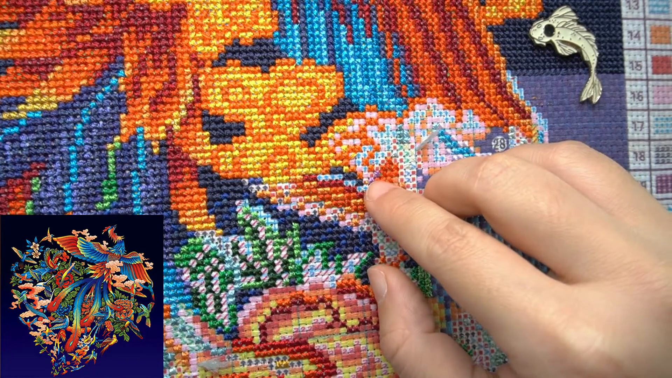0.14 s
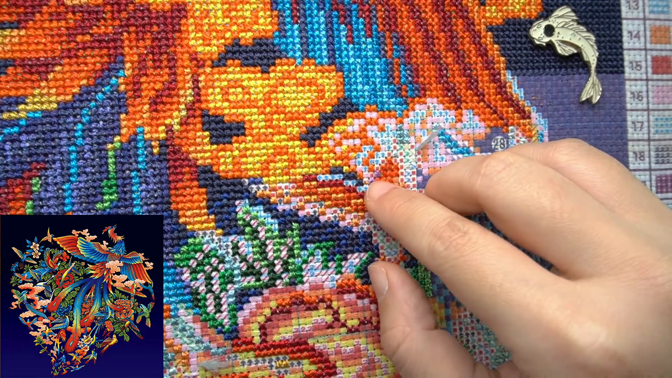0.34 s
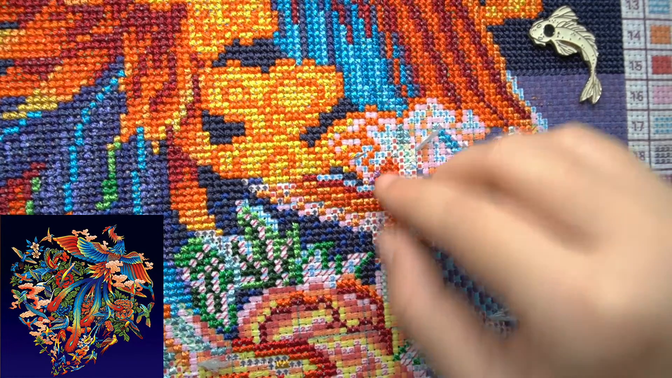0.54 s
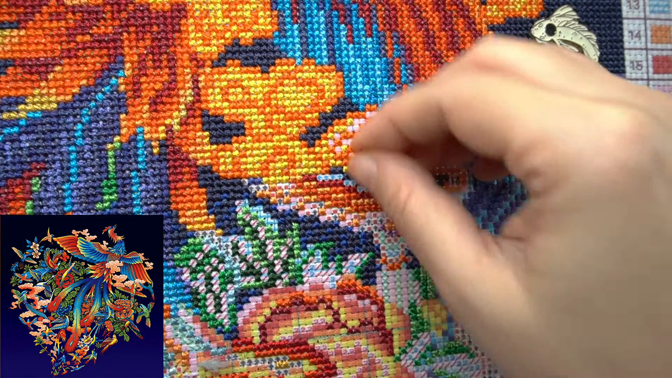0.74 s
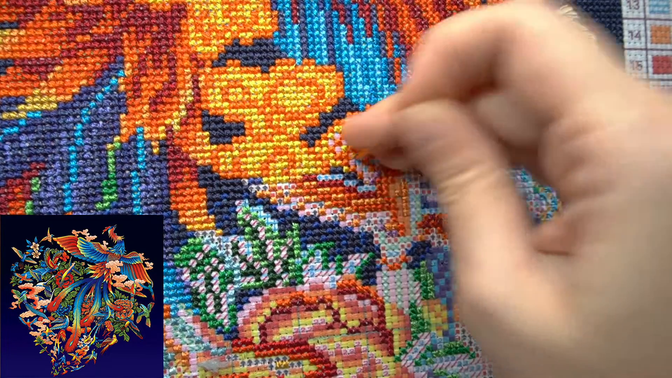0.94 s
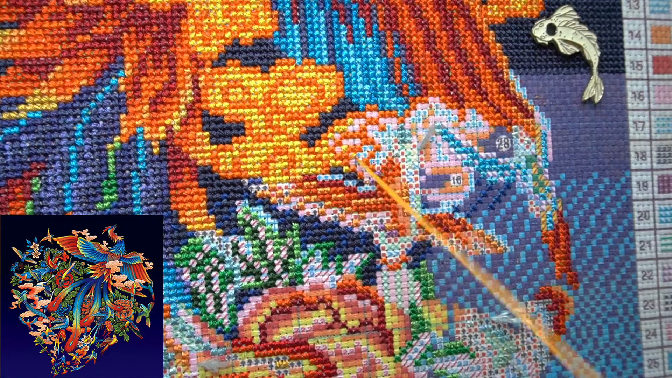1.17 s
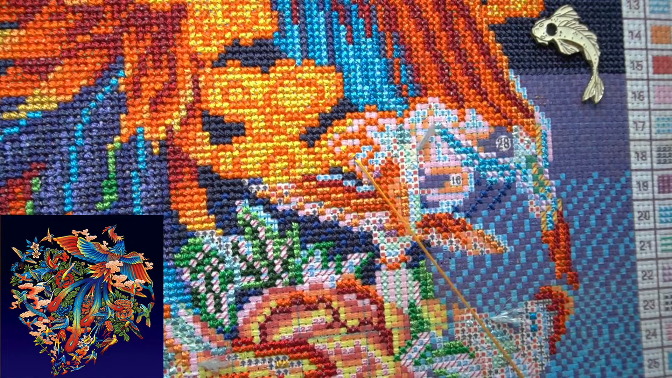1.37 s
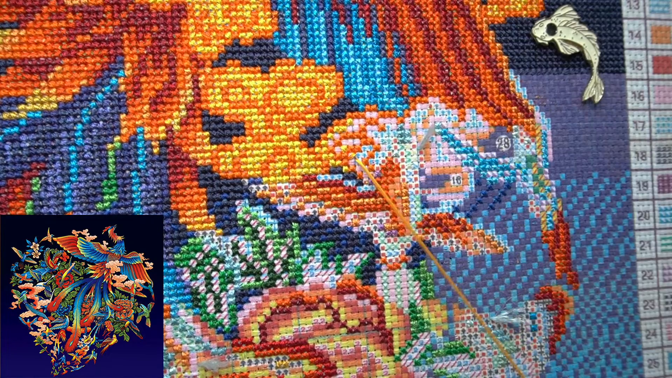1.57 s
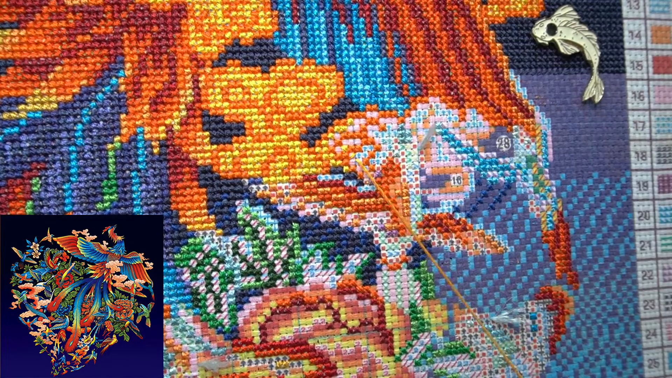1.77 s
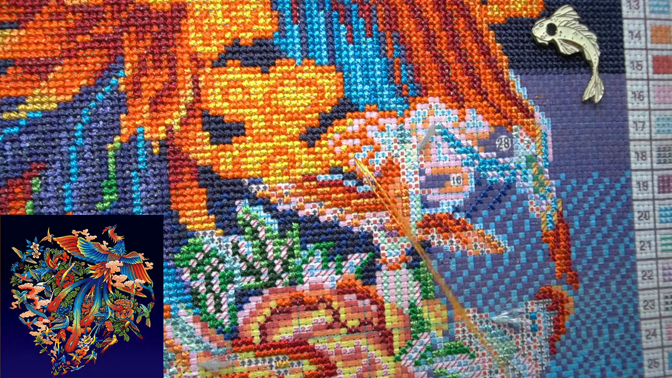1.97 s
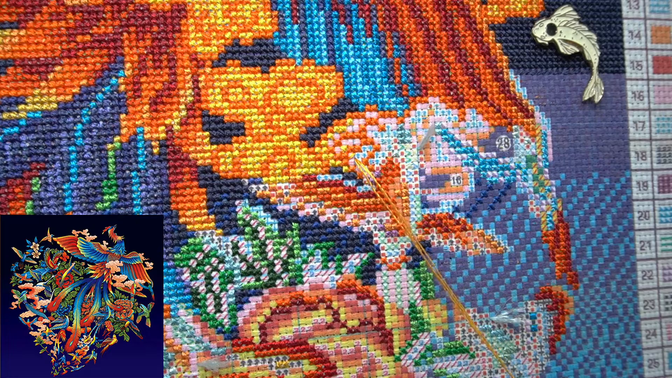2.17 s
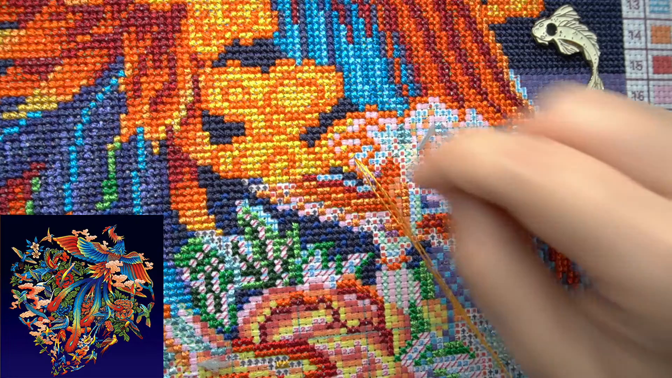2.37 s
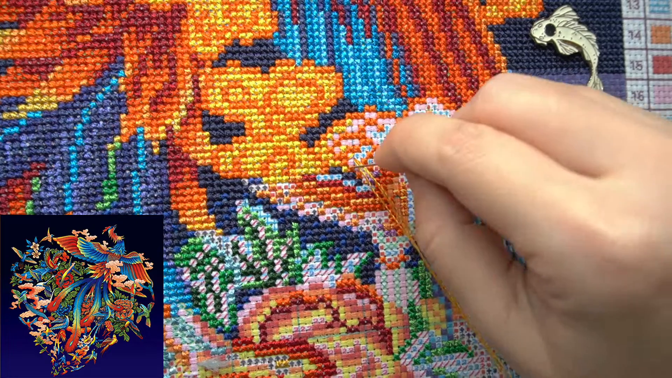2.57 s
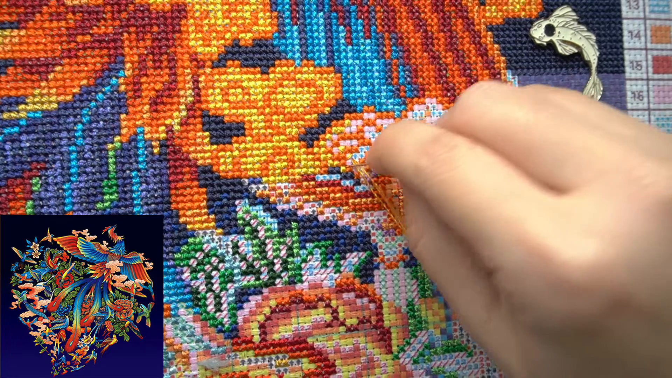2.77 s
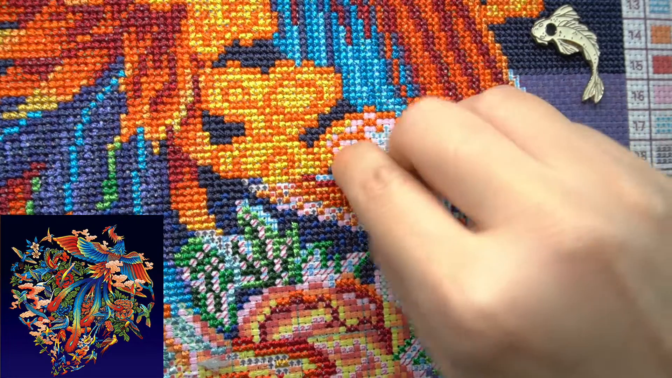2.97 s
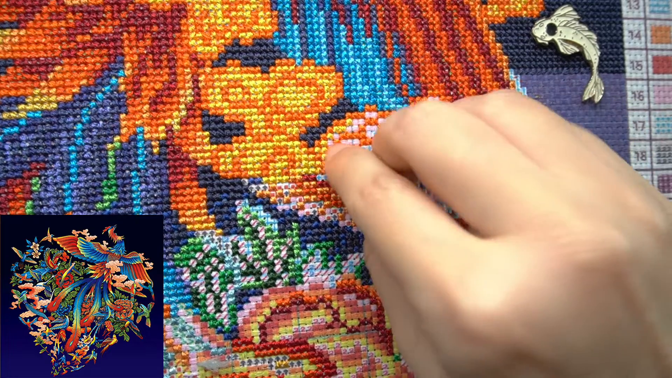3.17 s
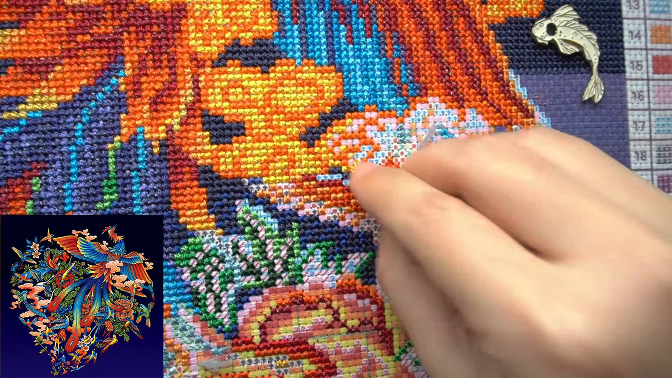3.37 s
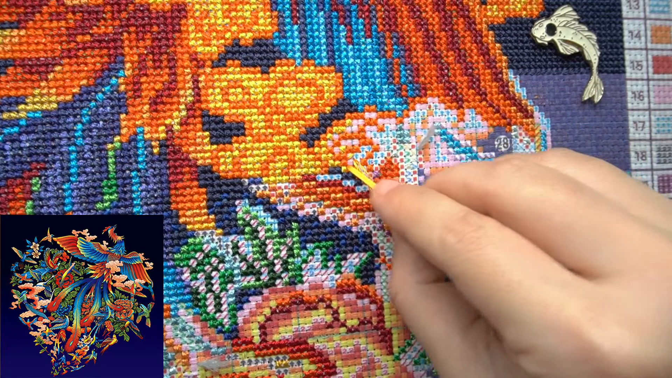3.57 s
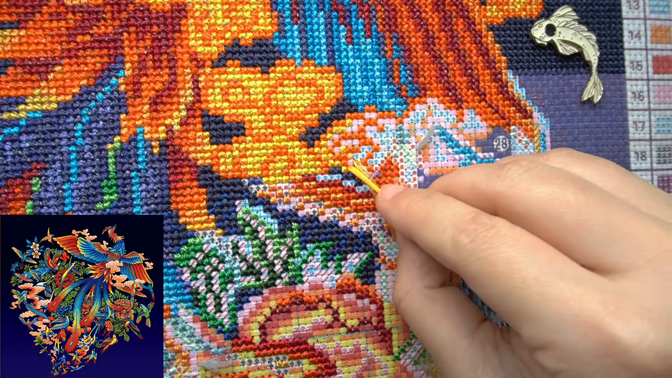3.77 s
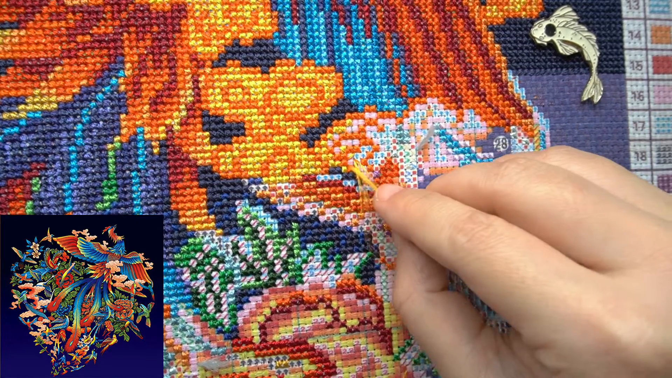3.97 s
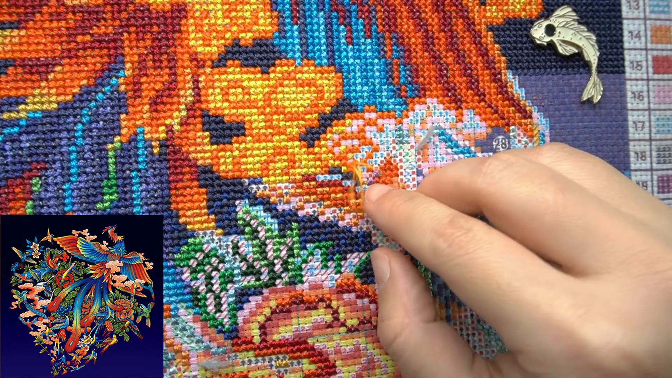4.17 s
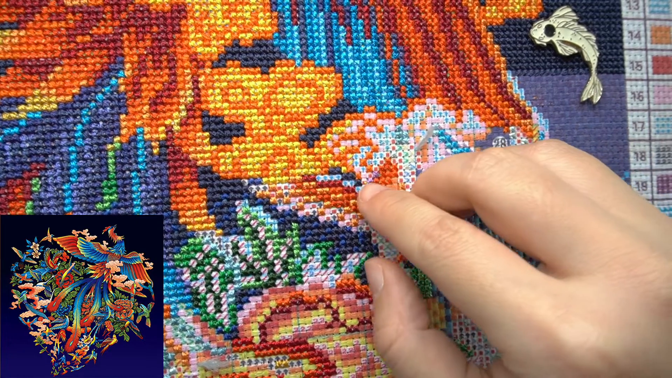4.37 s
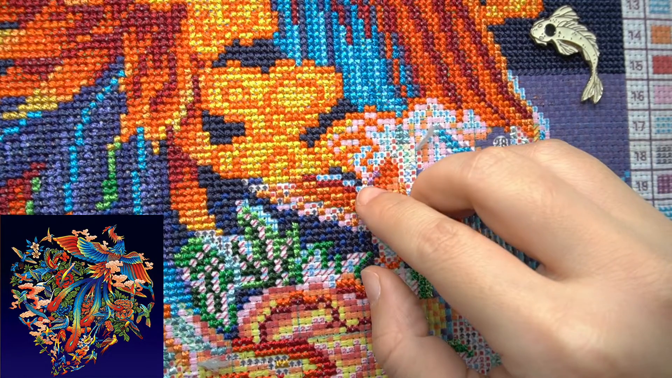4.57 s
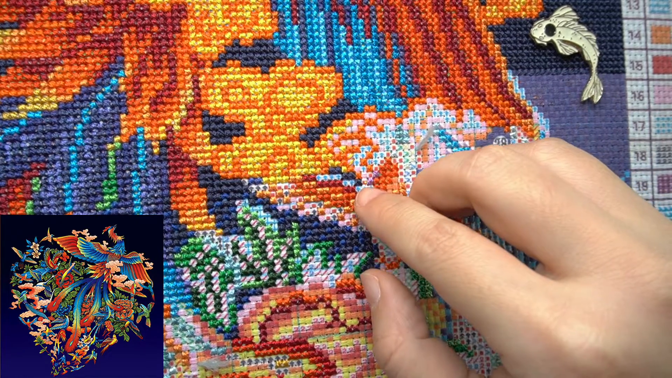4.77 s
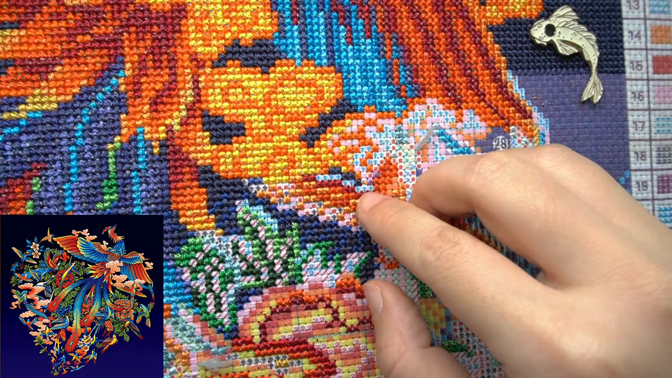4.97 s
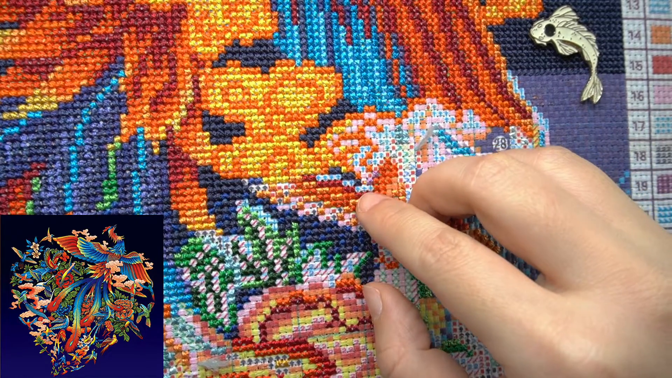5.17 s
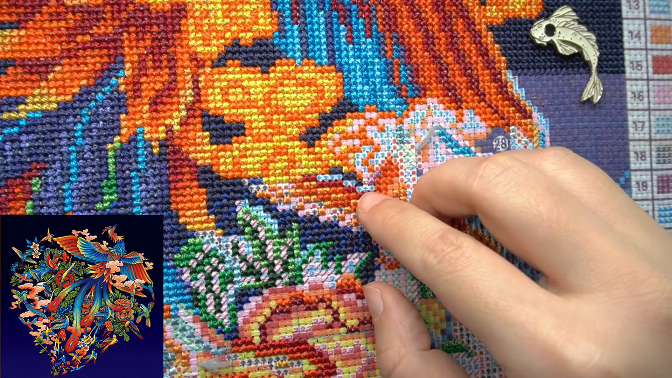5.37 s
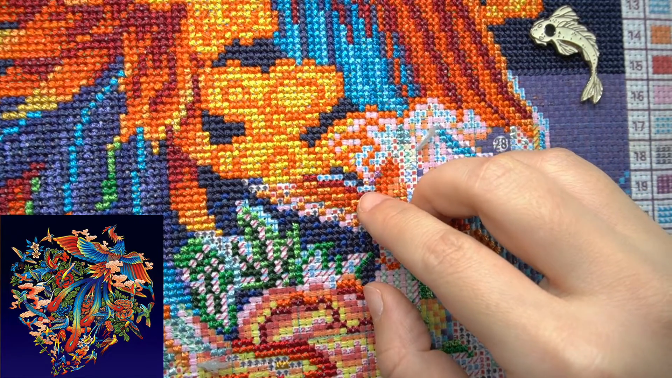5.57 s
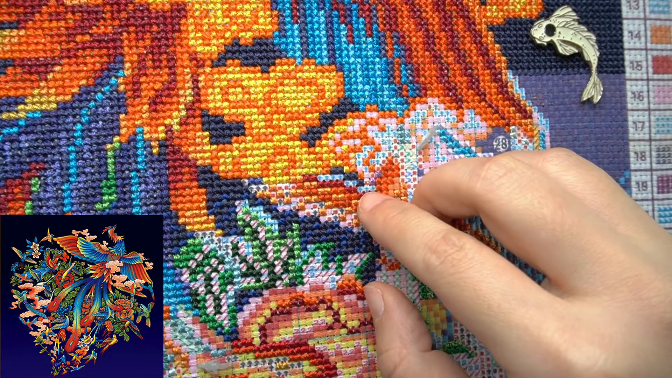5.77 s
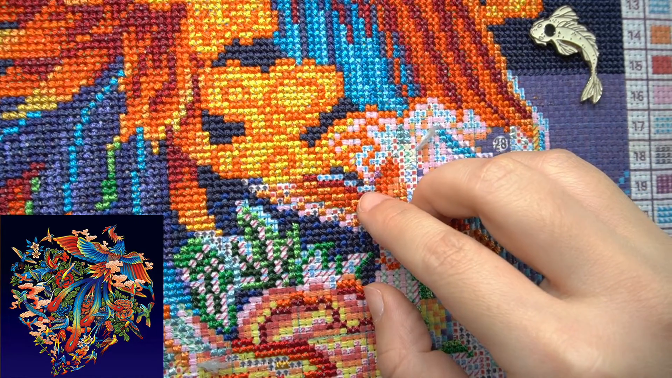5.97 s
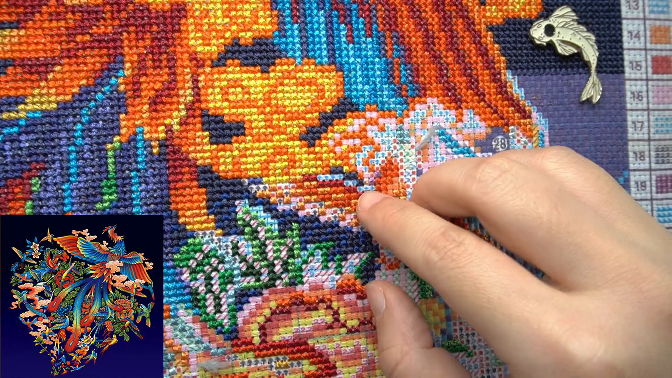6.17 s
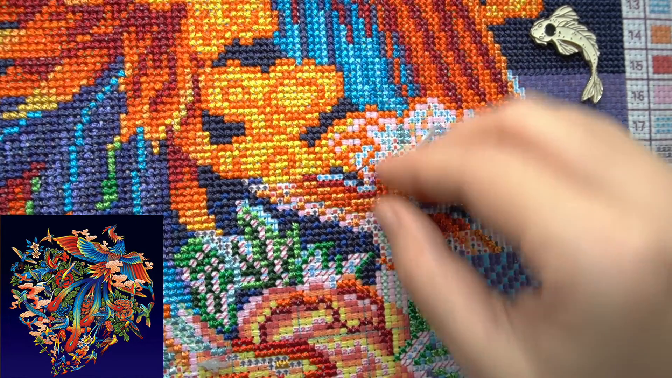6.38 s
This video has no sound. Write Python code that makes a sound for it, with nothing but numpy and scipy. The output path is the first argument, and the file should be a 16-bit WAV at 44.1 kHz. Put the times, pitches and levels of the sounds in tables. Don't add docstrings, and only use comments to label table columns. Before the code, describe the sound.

Needle pops through drum-tight cloth, a quick rasping thread pull follows, then a duller pop, softer pull and a last sharp tick in a quiet room.

```python
import sys
import numpy as np
from scipy import signal
from scipy.io import wavfile

SR = 44100
rng = np.random.default_rng(int(sys.argv[2]) if len(sys.argv) > 2 else 0)


def dump(signal):
    limited = np.clip(np.atleast_2d(signal).T, -1, 1)
    pcm = np.round(limited * 32767).astype(np.int16)
    wavfile.write(sys.argv[1], SR, pcm)


def how_loud(loudness_db):
    steps = np.asarray(loudness_db, float) / 20
    return 10 ** steps


N = 283122

# whole-cloth sway, body, weave, fibre hiss [f/Hz]
ZONE_EDGES_HZ = [520, 2600, 5700]
HOLE_CHANGES_S = [2.4, 3.9, 5.0]
# [f/Hz, left minus right level/dB]
LEAN = [(200, 0), (700, -.5), (1300, -2.5), (2400, -2), (4400, -0.2), (8000, 0), (14000, -4)]
# [t/s, drag level/dB, tautness/dB]
PULLS = [
    [(1.03, -81, -4), (1.064, -55, -14), (1.105, -44.5, -4), (1.144, -41, -1.5), (1.185, -41.5, -4),
     (1.2, -39.5, -1), (1.276, -38, -1), (1.342, -39.5, 1), (1.36, -37.5, 1.5), (1.432, -42, 1.5),
     (1.454, -40, 1.5), (1.508, -47.5, 2)],
    [(1.516, -51.5, 1.1), (1.62, -55.5, 0.6), (1.664, -58.5, 1), (1.832, -77.5, 5.5), (1.95, -91, 8.5)],
    [(3.54, -68, -4), (3.572, -66.5, -5), (3.616, -55.5, -6.5), (3.698, -51, -4.5), (3.786, -52, -1),
     (3.864, -50.5, 1.5), (3.932, -47.5, 2), (3.984, -55, 4), (4.01, -50.5, 0.5)],
    [(4.08, -58.5, 1), (4.206, -64, 1.5), (4.33, -69.5, 2.5), (4.42, -82, 7), (4.6, -98, 7)],
]


def rms_one(x):
    return x / np.sqrt(np.mean(x ** 2) + 1e-20)


def at_hz(points, hz):
    points = np.array(points)
    return np.interp(np.log(hz), np.log(points[:, 0]), points[:, 1])


def drift(rate):
    r = np.exp(-80 * np.pi * rate / SR)
    noise = rng.standard_normal(N // 40 + 2002)
    slow = signal.lfilter([1], [1, -2 * r, r * r], noise)[2000:]
    return np.interp(np.arange(N) / 40, np.arange(len(slow)), rms_one(slow))


def above(x, hz, order):
    return signal.sosfilt(signal.butter(order, hz, "high", fs=SR, output="sos"), x)


def ring(drive, hz, width_hz):
    r, w = np.exp(-np.pi * width_hz / SR), 2 * np.pi * hz / SR
    return signal.lfilter([0, np.sin(w)], [1, -2 * r * np.cos(w), r * r], drive + 1e-18)


def band(drive, hz, width_hz):
    r, w = np.exp(-np.pi * width_hz / SR), 2 * np.pi * hz / SR
    twice = [[1, 0.0036, 0, 1, -2 * r * np.cos(w), r * r]] * 2
    energy = np.sum(signal.sosfilt(twice, signal.unit_impulse(4096)) ** 2)
    return signal.sosfilt(twice, drive) / np.sqrt(energy)


def pair(mid, side, alike):
    alike = np.clip(alike, 0, 1)
    return (np.sqrt(1 + alike) * mid + np.sqrt(1 - alike) * side * [[1], [-1]]) / np.sqrt(2)


def lean(hz):
    return how_loud(at_hz(LEAN, hz) / 2 * np.array([[1], [-1]]))


def finger_gains(t):
    # [t/s, level/dB]
    pressure = [(0.0, -79), (.25, -70), (.5, -95), (.62, -66.5), (.68, -58.5), (.72, -61.5), (.8, -69.5),
                (.85, -63), (.9, -59), (1.03, -60.5), (1.9, -84.5), (2.56, -103), (2.84, -74.5),
                (3.2, -76.5), (3.45, -68.5), (4.7, -76.5), (5.3, -83.5), (5.69, -66.5), (5.95, -87),
                (6.42, -67)]
    skin_db = [-9.5, -3.5, -14, -10]
    grip = [-0.16, 0.38, 0.72, 0.14]
    pressure_db = np.interp(t, *np.transpose(pressure)) + 2.4 * drift(29)
    return how_loud(pressure_db + np.array(skin_db)[:, None] + np.outer(grip, pressure_db + 72))


def thread_gains(t):
    # [dB at first hole, dB at second, dB per dB of tautness]
    sway_law = (-6.5, 3.6, -7)
    weave_law = (-6, -1.5, 0.18)
    fibre_law = (-8.5, -7.5, 1.84)
    slack_share = 0.02
    s, drag_db, taut_db = np.transpose(sum(PULLS, []))
    pause = (t > PULLS[1][-1][0]) & (t < PULLS[2][0][0])
    moving = (t > s[0]) & (t < s[-1]) & ~pause
    drag_db, taut_db = np.interp(t, s, drag_db), np.interp(t, s, taut_db)
    later = t > HOLE_CHANGES_S[0]
    sway, weave, fibre = [np.where(later, second, first) + slope * taut_db
                          for first, second, slope in (sway_law, weave_law, fibre_law)]
    sway = sway - sway_law[2] * np.minimum(taut_db, 0) * (1 - slack_share)
    return moving * how_loud(drag_db + np.array([sway, 0 * t, weave, fibre]))


def add_scuffs(gains, t):
    # [t/s, length/s, level/dB, sharpness/dB]
    scuffs = [(0.565, 0.039, -67.5, 8.5), (0.612, 0.027, -63, 5), (0.649, 0.01, -58, -5),
              (0.671, 0.026, -64.5, -10), (0.735, 0.0074, -57.5, 4), (0.747, 0.013, -62, 8),
              (0.765, 0.019, -56.5, 2.5), (0.784, 0.042, -62, 5.5), (0.861, 0.0056, -54, -4),
              (0.881, 0.027, -65, 10), (0.906, 0.035, -45.5, 3.5), (0.931, 0.011, -45.5, -11),
              (0.987, 0.02, -54, 6), (3.133, 0.029, -70, 0), (3.18, 0.055, -72.5, 10),
              (3.322, 0.011, -67, 9), (3.329, 0.043, -57, -4), (3.473, 0.0069, -52, 3),
              (3.478, 0.053, -62, 5), (4.368, 0.015, -70, -2), (5.273, 0.015, -73, 9),
              (5.32, 0.014, -67.5, -1), (5.378, .022, -73, 10), (5.591, 0.01, -55, -4),
              (6.355, 0.004, -68, 14), (6.406, .043, -57, -5)]
    # [level/dB, dB per dB of sharpness]
    steel_law = [
        (-2, -0.54),
        (-7, 0.44),
        (-17.5, 1.68),
    ]
    for start, length, db, sharp_db in scuffs:
        sway, weave, fibre = [db + base + slope * sharp_db for base, slope in steel_law]
        i, j = int(start * SR), int((start + length + .02) * SR)
        rise = (t[i:j] - start) / .003
        fall = (start + length - t[i:j]) / .006 + 1
        shape = np.clip(np.minimum(rise, fall), 0, 1)
        gains[:, i:j] = np.hypot(gains[:, i:j], np.outer(how_loud(np.array([sway, db, weave, fibre])), shape))
    return gains


def drag_levels():
    t = np.arange(N) / SR
    gains = np.hypot(thread_gains(t), finger_gains(t))
    gains[3] = np.hypot(gains[3], how_loud(-86))
    return add_scuffs(gains, t)


def tautness():
    t, out = np.arange(N) / SR, np.zeros(N)
    for rows in (PULLS[0] + PULLS[1], PULLS[2] + PULLS[3]):
        s, _, taut_db = np.transpose(rows)
        out += np.interp(t, s, taut_db, left=0, right=0)
    return out


def catches():
    per_s, spread_db = 4500, 1.6
    sizes = how_loud(spread_db * np.minimum(rng.exponential(1, (2, N)), 5)) * rng.choice([-1, 1], (2, N))
    return rms_one(sizes * (rng.random((2, N)) < per_s / SR))


def rubbed_cloth():
    # [f/Hz, width/Hz, level/dB at first hole, level/dB at second]
    cloth = [(225, 66, -17, -40), (312.2, 35, 3, 9.5), (404, 68, 8, 7), (592, 41.4, 4, 0.5),
             (708.7, 63, 7.5, 0), (821, 109, 8.5, -3), (980, 240, -25, -20), (1291, 143, 2.5, -1.5),
             (1368, 94, 3.5, -11.5), (1852, 120, -11, -15.5), (1975, 248, -0.5, -6.5), (2255, 87, -2, -8.5),
             (2400, 250, -3, -15), (2830, 135, -14, -5), (3040, 110, -14, -33), (3710, 220, -9, -3.5),
             (3988, 395, -20, -5), (4232, 550, -9.5, -3.5), (4680, 293, -10.5, -2.5),
             (4860, 250, -17, -8.5), (5060, 480, -13, -16), (6060, 130, -11.5, -19.5),
             (7010, 270, -14.5, -17.5), (7680, 390, -16.5, -32), (8170, 930, -12, -18.5),
             (8610, 560, -26, -21.5), (10020, 530, -24, -22.5), (10700, 560, -19.5, -19.5),
             (11590, 900, -14.5, -20), (12060, 740, -17, -22), (13830, 1600, -20, -22.5),
             (12790, 700, -26, -23), (15000, 1500, -28, -31), (14600, 400, -32, -33),
             (13000, 350, -27, -28)]
    # [dB per dB of tautness at first hole, at second]
    taut_colour_db = [(-1, -.6), (-0.5, 0.097), (0.45, .6), (0.1, -0.096), (.6, -0.2), (0.24, -0.26),
                      (4.8, .1), (-0.2, -0.26), (0.7, .1), (.3, .1), (0.15, 0.32), (.1, 0.37), (-0.4, 0.37),
                      (2.1, 0.33), (1.8, .1), (-.2, -0.026), (1.5, -0.037), (-0.4, 0.028), (0, 0.4),
                      (2.3, 0.23), (-0.1, 0.19), (-0.6, .1), (.1, .1), (-0.5, -.1), (0.04, -0.34),
                      (.1, -0.22), (-.6, .1), (0.7, .1), (-0.3, -.2), (0.7, -.2), (-.1, -0.19), (2, .1),
                      (.1, .1), (2, .1), (.1, .1)]
    rub_colour_db = [.1, -0.2, 0.7, -0.5, -0.5, -1.2, 3, -3, 0.8, 5, -1.2, -1, 0.3, 2.5, 5, -.1, 1, -0.4,
                     -0.5, 4, -0.5, 1.5, 0, -1.5, -2, 2.5, 1, 0, -3, -1, -3, -.1, -.1, -5, -.1]
    # [f/Hz, likeness]
    likeness = [(300, 0.98), (1300, 0.93), (3000, 0.81), (7000, 0.91), (14000, 0.79)]
    air_from_hz, air_full_db, air_steepness = 9300, -43, 0.056
    flutter_db = -0.48
    hz, width, first, second = np.transpose(cloth)
    zone, gains, drive = np.searchsorted(ZONE_EDGES_HZ, hz), drag_levels(), catches()
    air = gains[3] * (gains[3] / how_loud(air_full_db)) ** air_steepness
    later, tug = np.arange(N) > HOLE_CHANGES_S[0] * SR, drift(37)
    taut_db = tautness()
    out = np.zeros((2, N))
    for k in range(len(hz)):
        mates = zone == zone[k]
        share_first, share_second = [
            how_loud(db[k]) * np.sqrt(width[k] / np.sum(how_loud(2 * db[mates]) * width[mates]))
            for db in (first, second)]
        taut_first, taut_second = taut_colour_db[k]
        uneven_db = flutter_db * tug + 1.19 * drift(9.5)
        uneven_db += taut_db * np.where(later, taut_second, taut_first)
        uneven_db += rub_colour_db[k] * (taut_db == 0)
        gain = air if hz[k] > air_from_hz else gains[zone[k]]
        gain = gain * how_loud(uneven_db) * np.where(later, share_second, share_first)
        mid, side = band(drive * gain, hz[k], width[k])
        out += lean(hz[k]) * pair(mid, side, at_hz(likeness, hz[k]))
    rumble = how_loud(-27) * gains[0] * rms_one(ring(drive[1], hz=100, width_hz=66))
    return rumble + above(out, 252, order=5)


def hush():
    # [f/Hz, level/dB per Hz]
    noise_colour = [(12, -52), (20, -44), (37, -1.5), (70, -6), (134, -5), (168, -13.5), (234, 1.5),
                    (367, -3), (574, -1), (660, -2), (1120, -1), (1260, -4), (2020, -5), (12800, -17.5),
                    (16000, -18)]
    # [f/Hz, likeness]
    noise_likeness = [(60, 1), (130, 0.95), (290, 0.61), (640, 0.0047), (3000, 0.004), (15000, 0.18)]
    out, edges = 0, 20 * 2 ** np.arange(0, 10, .5)
    white = rng.standard_normal((2, 2, N))
    for k, (low, high) in enumerate(zip(edges, np.append(edges[1:], 18000))):
        half_octave = signal.butter(2, [low, high], "band", fs=SR, output="sos")
        mid, side = signal.sosfilt(half_octave, white[k % 2])
        hz = np.sqrt(low * high)
        level = how_loud(at_hz(noise_colour, hz) + 0.08 * drift(4.8))
        out = out + level * pair(mid, side, at_hz(noise_likeness, hz))
    return how_loud(-66.5) * rms_one(out) * how_loud([[-.2], [.2]])


def squeaks():
    # [t/s, length/s, level/dB, f/Hz, width/Hz]
    slides = [(0.177, .14, -72, 1045, 80), (0.49, .16, -69, 3790, 120), (0.63, .07, -74, 7300, 900),
              (3.144, .036, -72, 7600, 2210), (3.19, .051, -64.5, 1880, 131),
              (3.334, .046, -68, 8200, 1510), (4.365, .036, -66, 570, 61), (4.378, .021, -69, 1301, 501),
              (5.277, .024, -68, 700, 81), (6.231, .041, -68.5, 1760, 201), (1.19, .23, -46, 590, 25),
              (1.195, .07, -42, 720, 60), (1.25, .09, -47, 420, 40), (1.3, .07, -46, 690, 50),
              (1.36, .09, -43, 830, 50), (1.43, .09, -46, 720, 70), (1.34, .12, -48, 1280, 70),
              (1.3, .1, -52, 1850, 60), (1.18, .03, -49, 4200, 700), (1.09, .18, -64, 9900, 250),
              (1.3, .12, -51, 7500, 800), (1.53, .1, -58, 1280, 70), (3.56, .16, -64, 200, 30),
              (3.78, .09, -52, 310, 30), (3.86, .07, -54, 410, 40), (3.89, .07, -52, 1260, 70),
              (3.98, .04, -56, 1930, 150), (4.05, .07, -62, 200, 30), (3.8, .16, -64, 7100, 250),
              (3.88, .07, -66, 12900, 400), (.772, .014, -57, 4500, 900), (.781, .012, -57, 2800, 800),
              (.621, .03, -66, 2110, 300), (.665, .035, -63, 2010, 500), (6.36, .015, -66, 700, 100),
              (3.5, .07, -64, 200, 50), (3.6, .12, -66, 8300, 400), (1.12, .04, -52, 2300, 300),
              (1.25, .1, -60, 6050, 120), (1.34, .05, -50, 2200, 300),
              (3.9, .07, -58, 4400, 1200), (3.9, 0.074, -57, 300, 37), (1.24, .06, -48.5, 3770, 270),
            (1.4, .1, -57, 5200, 300), (1.22, 0.22, -66, 14500, 300), (1.3, .24, -63, 12000, 300),
            (1.55, 0.17, -68, 7430, 500)]
    songs = slides
    out, rub = np.zeros((2, N)), rng.standard_normal((len(songs), SR // 4))
    for noise, (s, length, db, hz, width) in zip(rub, songs):
        swell = np.hanning(int(np.clip(length, .01, .24) * SR))
        i = int(s * SR)
        out[:, i:i + len(swell)] += how_loud(db) * lean(hz) * swell * band(noise, hz, width)[-len(swell):]
    return out


def thuds():
    # [t/s, level/dB, f/Hz]
    bumps = [(.218, -72, 91), (.3, -74, 97.5), (0.649, -70, 94), (.87, -68, 100), (0.921, -58, 100),
             (.973, -40.5, 100), (1.0, -51, 109), (2.743, -73, 123), (3.089, -74, 95), (3.15, -69, 98),
             (3.337, -64, 100), (3.477, -55.5, 100), (3.6, -73, 82), (3.699, -69, 74.4), (4.045, -55, 172),
             (5.585, -66, 114), (.973, -59, 180), (0.974, -52, 60), (3.341, -57.5, 196), (3.721, -56, 190),
             (4.11, -65, 187), (3.598, -61, 185)]
    out, push = np.zeros(N), np.hanning(int(0.0073 * SR))
    for s, db, hz in bumps:
        i = int(s * SR)
        drive = np.pad(how_loud(db) * push / push.sum() * 2, (0, SR // 2))
        out[i:i + len(drive)] += ring(drive, hz, width_hz=14.4)
    return out


def needle():
    # [t/s, peak level/dB, push into cloth/dB, snap of weave/dB, contact/ms]
    pops = [(0.6528, -44, -3, 15, .1), (0.7305, -42, -2.5, 13, .1), (0.776, -56, -19, 34, 0.1),
            (0.778, -62, -12, 24, .1), (0.7807, -54, -10, 27, .1), (.678, -53, 11.5, -3, 0.46),
            (.893, -49, -7, 5, .15), (.7865, -46, -13, 14, 0.2), (0.625, -53.5, 5, 23, 0.13),
            (.699, -49, 7.5, 2, .2), (0.754, -51, 1, 4, 0.18), (0.81, -55, -1, 5, .2),
            (0.8685, -40, -14, 11, 0.04), (0.913, -33, -5, 6, .045), (0.934, -35, -4, 18, 0.046),
            (0.9739, -14.5, -5.5, -3, 0.42), (0.9743, -37, 5, 21, 0.053), (0.9756, -41, 0, 25, .06),
            (1.0295, -57, -5, 12, .12), (.998, -39, -11, 1, 0.56), (2.748, -50, 12, 10, 0.42),
            (2.985, -60, 10, 0, .4), (3.15, -56, 5, 0, .4), (2.869, -48, -8, -1.5, 0.29),
            (3.09, -46, -7, 0, 0.49), (3.327, -53.5, -2, 13, .05), (3.392, -59, 12, .1, 0.49),
            (3.478, -24.5, 4, 11, 1.19), (4.036, -41, -30, 20, 0.023), (4.0373, -21, -0.5, -6.5, 0.47),
            (4.379, -49, -11, 3, 0.39), (5.284, -55, -23, -19, 0.4), (5.393, -57, 25, 4, .08),
            (5.5864, -18, 11, -6, 0.033), (5.589, -26, -3, -21, 0.21), (5.5901, -33, -3, -12, 0.47),
            (5.8193, -55, 17, 0, 0.36), (6.3553, -58, -8, 17.5, 0.037)]
    # [f/Hz, width/Hz, level/dB at each of four holes]
    pluck = [(228, 92, 14, -35, -14, -32), (338, 51, 8.5, 5, 6.5, -7.5), (424, 340, 4, 4, -3, -4),
             (710, 110, -44, 3, 5, 2), (875, 136, 9, -12, -5, 8), (1057, 105, -5.5, -21, -25, -10),
             (1278, 110, -3.5, 1.5, 1.5, 3.5), (1370, 110, -19, -28, -15, 1),
             (1820, 260, -32, -3, -26, 6.5), (2106, 190, -3, -13, 2, -23), (2880, 1100, -13, -3, 0, -26),
             (3500, 160, -27, -17, -14, -9), (3960, 390, -8.5, 6, 6.5, -10), (4640, 160, -36, -5, -19, -7),
             (4850, 470, -12, -34, -26, 0), (5900, 120, -46, -24, -26, -10),
             (7030, 350, -30, -22, -13, -3.5), (9050, 1200, -7, -17, 0, -30.5),
             (11100, 1300, -14, -32, -20, -6), (14000, 2000, -16, -32, -22, -26)]
    bulge_shares = [0.018, .1, 0.46, 0.26]
    bulge_lead = 9
    upper_snap = 0.34
    s, peak_db, sway_db, weave_db, contact_ms = np.transpose(pops)
    at, out = np.round(s * SR).astype(int), np.zeros((2, N))
    hole = np.searchsorted(HOLE_CHANGES_S, s)
    steps = np.arange(64)
    spots = at[:, None] + steps
    contact = np.clip(contact_ms, .01, 1.3)[:, None] * SR / 1000 + 2
    pushes = np.sin(np.pi * np.clip((steps + 1) / contact, 0, 1)) ** 2
    chance = rng.standard_normal((len(at), len(pluck)))
    for k, (hz, width, *db) in enumerate(pluck):
        body_db = upper_snap * weave_db * (hz > 1100)
        colour_db = [sway_db, body_db, weave_db, weave_db][np.searchsorted(ZONE_EDGES_HZ, hz)]
        strength = how_loud(peak_db - 13.5 + np.array(db)[hole] + colour_db + 0.5 * chance[:, k])
        drive = np.zeros(N)
        drive[spots] = pushes * (strength / pushes.sum(axis=1))[:, None]
        drive[spots - bulge_lead] -= np.take(bulge_shares, hole)[:, None] * drive[spots]
        out -= ring(drive, hz, width) * lean(hz)
    return above(out, 366, order=2)


def creak():
    # [t/s, upper mode level/dB, lower mode level/dB]
    slips = [(4.657, -54.5, -61), (4.667, -54, -75), (4.676, -69, -59), (4.683, -63, -69),
             (4.692, -55, -63), (4.699, -70, -72), (4.711, -53, -74), (4.718, -68, -68),
             (4.771, -55.5, -69)]
    # [f/Hz, width/Hz]
    frame_modes = [
        (615, 62),
        (457, 22),
    ]
    s, *levels = np.transpose(slips)
    out = np.zeros(N)
    for (hz, width), db in zip(frame_modes, levels):
        clicks = np.zeros(N)
        clicks[np.round(s * SR).astype(int)] = how_loud(db)
        contact = ring(clicks, hz, 2.54 * width) * 3.7 * np.pi * width / SR
        out += ring(contact, hz, width) * 2
    return out


def room(x):
    t60_s, treble_t60_s, treble_db, build_s = 0.3, 0.21, -1, 0.008
    t = np.arange(SR // 2) / SR
    echoes = rng.standard_normal((2, len(t)))
    low = signal.sosfilt(signal.butter(2, 4300, fs=SR, output="sos"), echoes)
    tail = low * how_loud(-60 * t / t60_s) + (echoes - low) * how_loud(treble_db - 60 * t / treble_t60_s)
    tail = tail * (1 - np.exp(-t / build_s))
    mid, side = signal.fftconvolve(x[None], tail / np.sqrt(np.sum(tail[0] ** 2)), axes=1)[:, :N]
    side = side - 0.56 * above(side, 5500, order=2)
    return pair(mid, above(side, 1070, order=1), alike=0.19)


def scene():
    close = rubbed_cloth() + needle() + creak()
    echo = room(above(close.mean(axis=0), 241, order=2))
    return close + thuds() + how_loud(-11.5) * echo + hush() + squeaks()


def band_limit(x):
    return signal.sosfilt(signal.butter(12, 16420, fs=SR, output="sos"), x)


def record(dry):
    top = signal.ellip(10, .5, 60, 15750, fs=SR, output="sos")
    mix = signal.sosfilt(top, above(dry, 68, order=2))
    return band_limit(mix)


dry = scene()
out = record(dry)
dump(out)
```